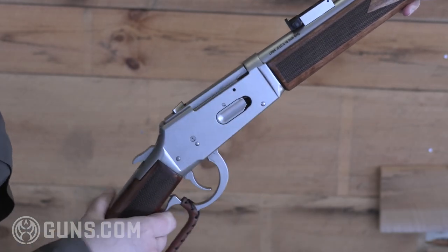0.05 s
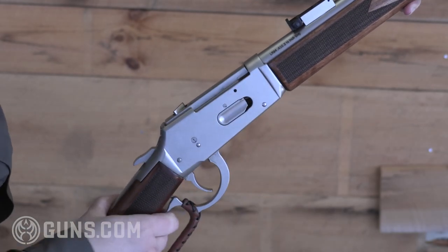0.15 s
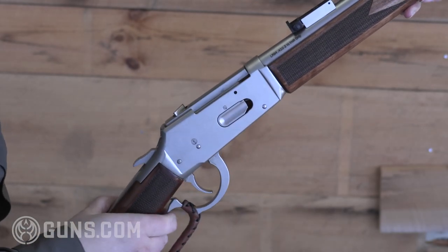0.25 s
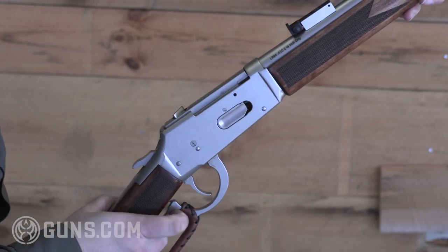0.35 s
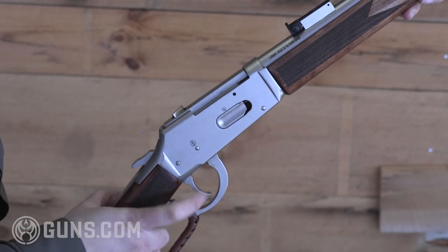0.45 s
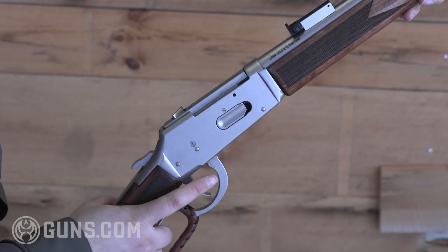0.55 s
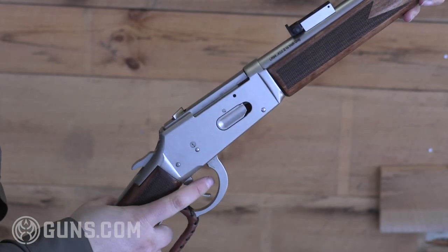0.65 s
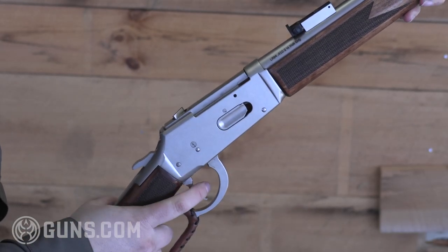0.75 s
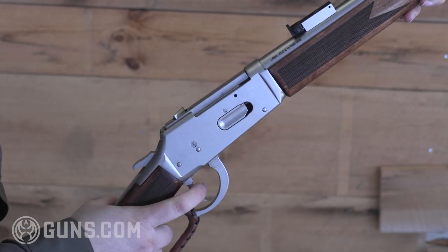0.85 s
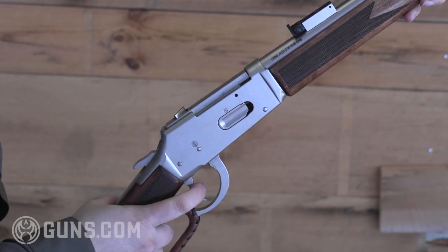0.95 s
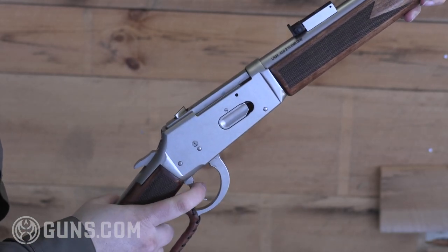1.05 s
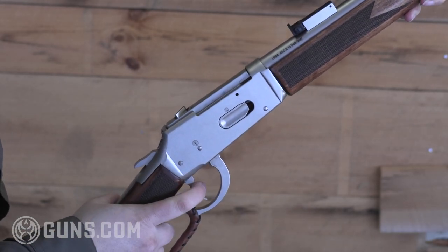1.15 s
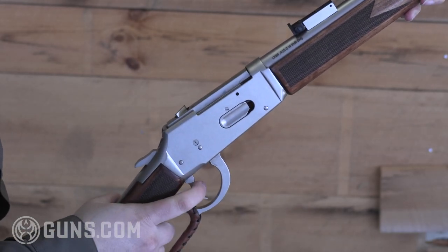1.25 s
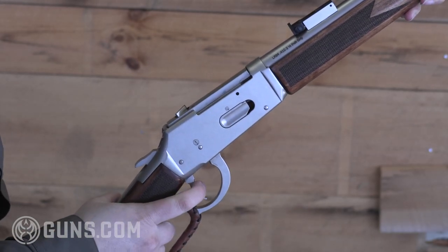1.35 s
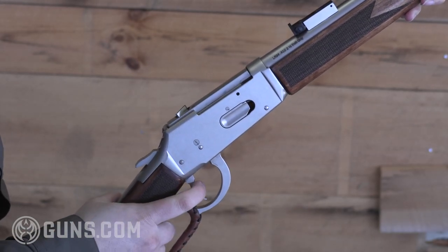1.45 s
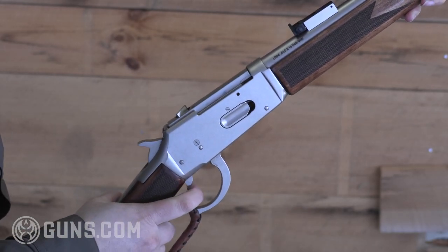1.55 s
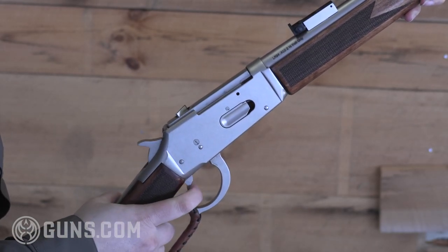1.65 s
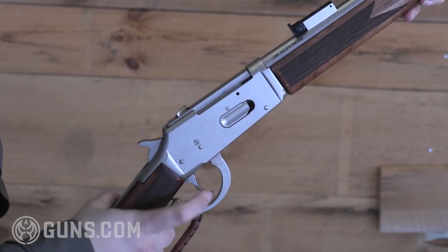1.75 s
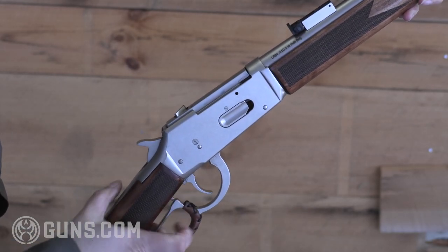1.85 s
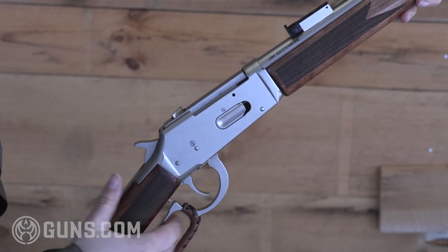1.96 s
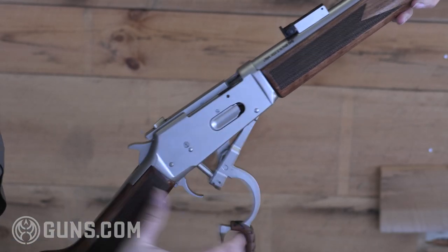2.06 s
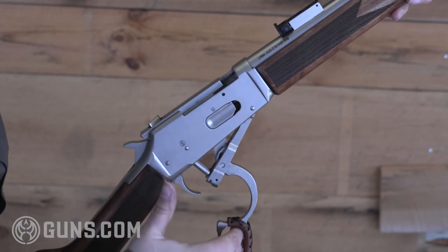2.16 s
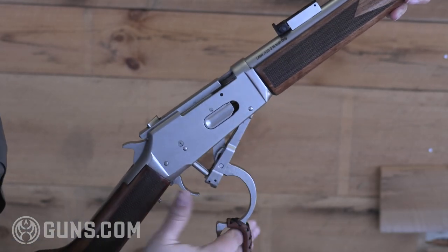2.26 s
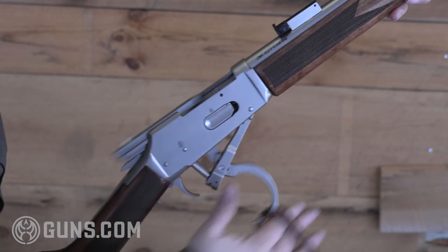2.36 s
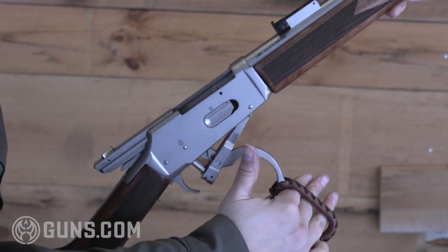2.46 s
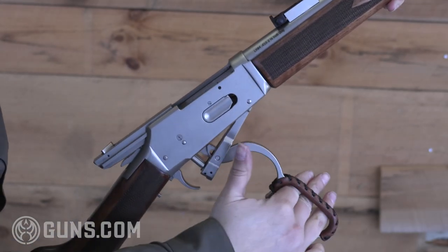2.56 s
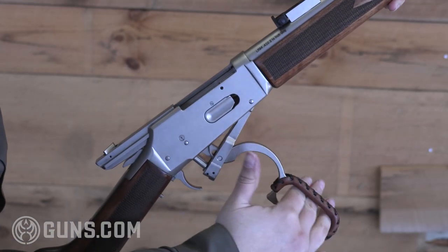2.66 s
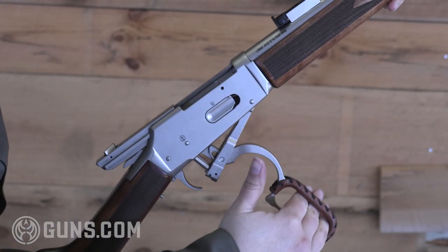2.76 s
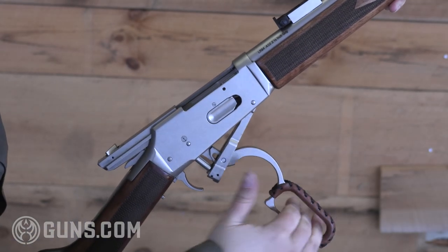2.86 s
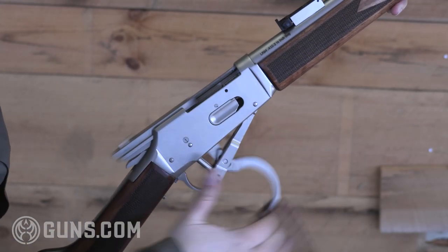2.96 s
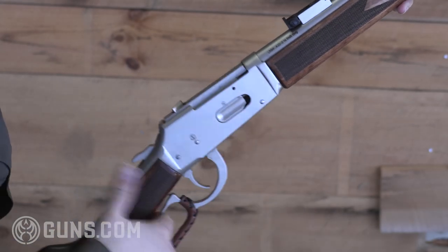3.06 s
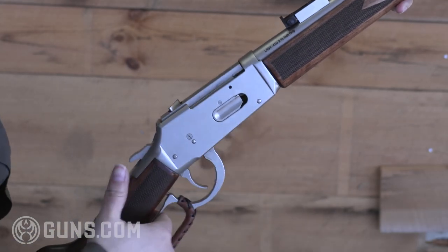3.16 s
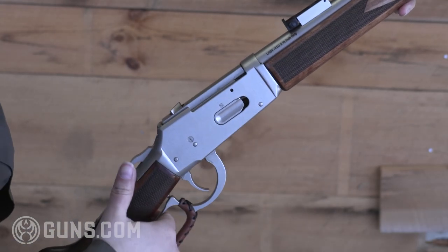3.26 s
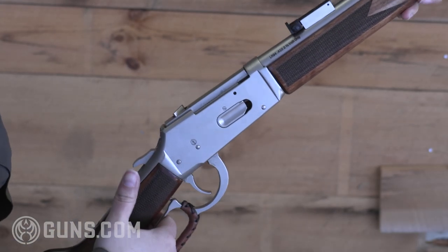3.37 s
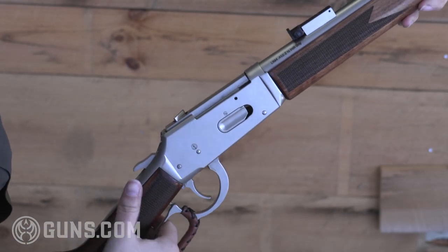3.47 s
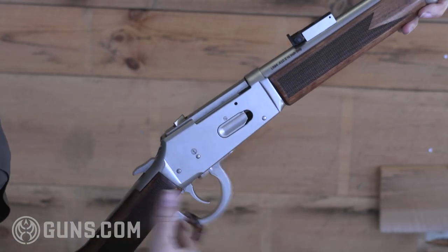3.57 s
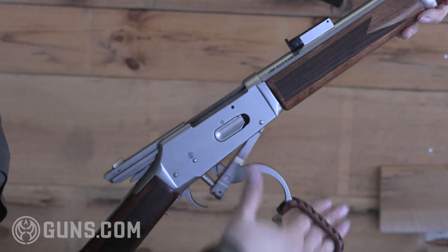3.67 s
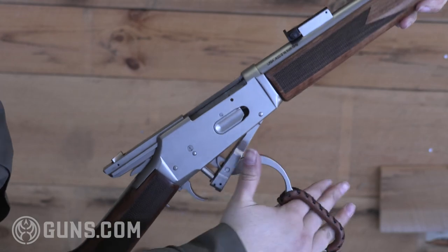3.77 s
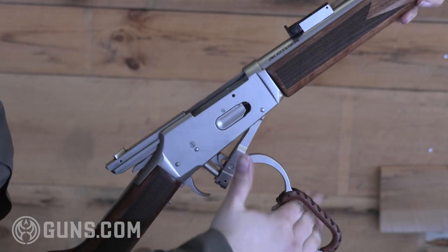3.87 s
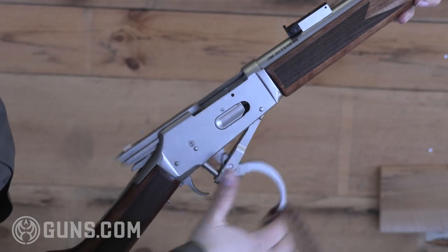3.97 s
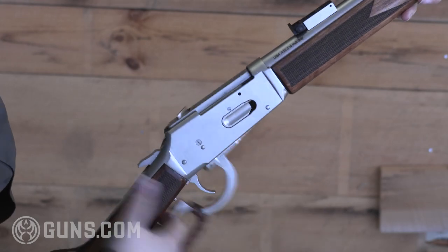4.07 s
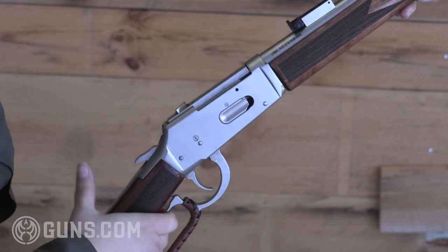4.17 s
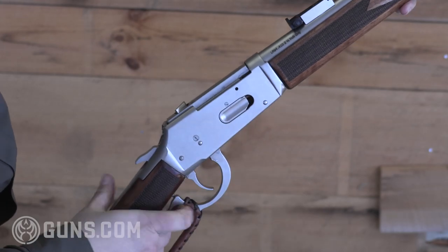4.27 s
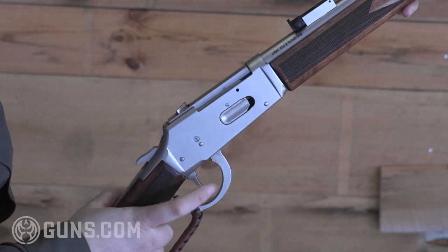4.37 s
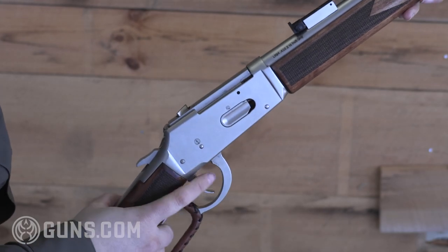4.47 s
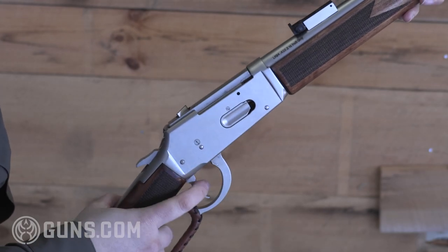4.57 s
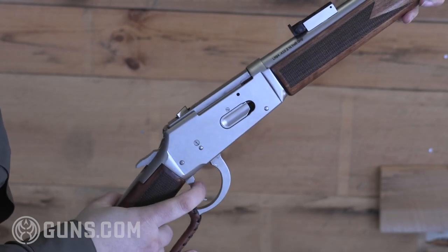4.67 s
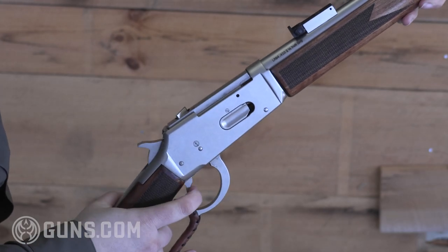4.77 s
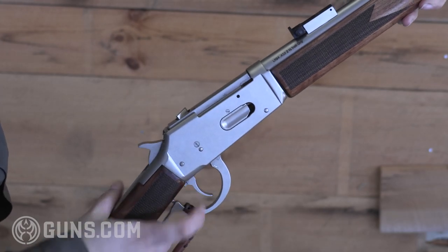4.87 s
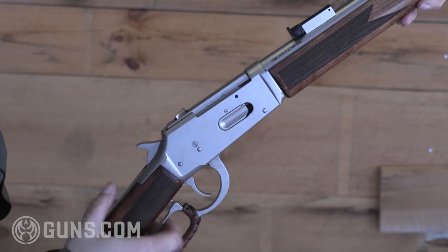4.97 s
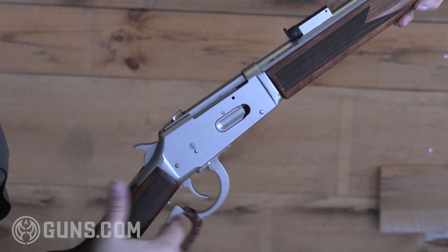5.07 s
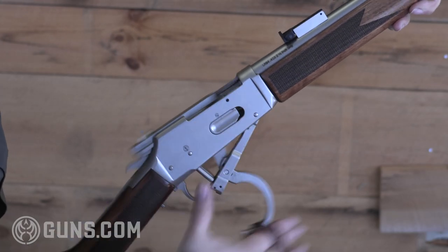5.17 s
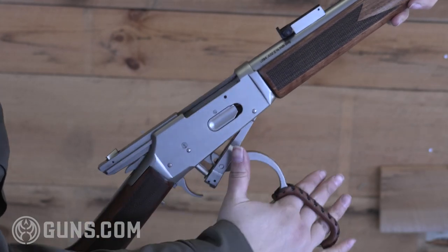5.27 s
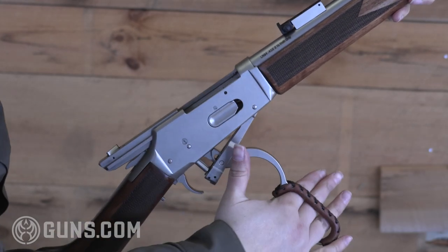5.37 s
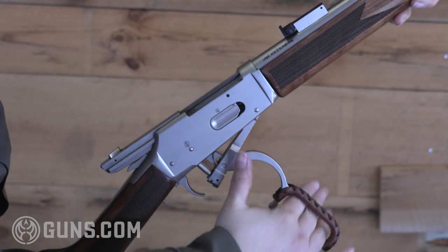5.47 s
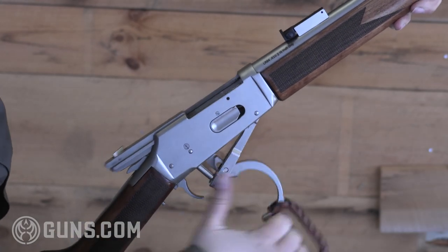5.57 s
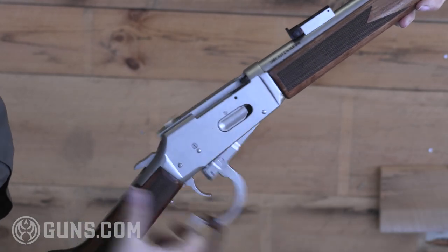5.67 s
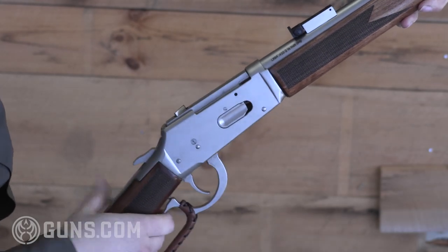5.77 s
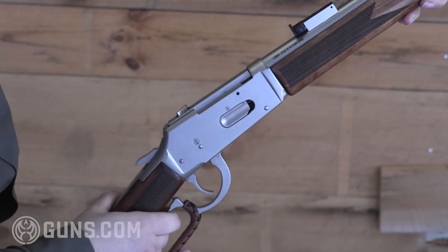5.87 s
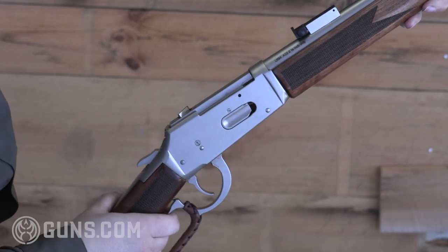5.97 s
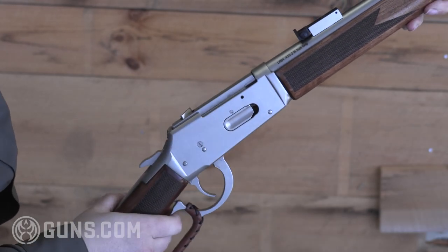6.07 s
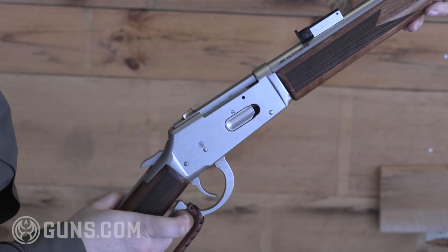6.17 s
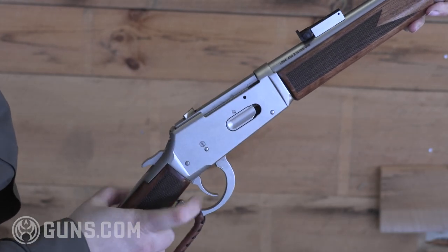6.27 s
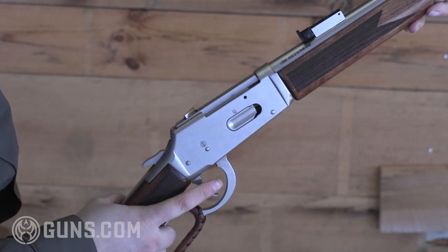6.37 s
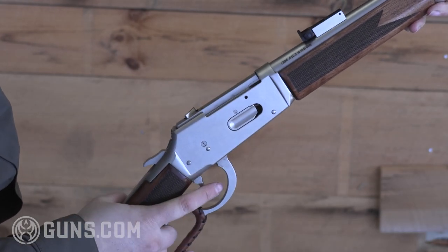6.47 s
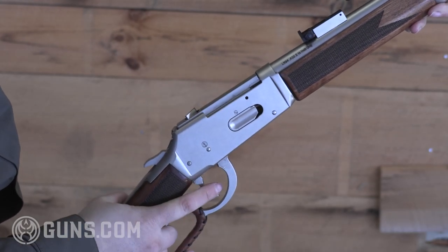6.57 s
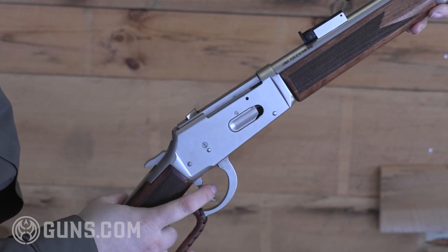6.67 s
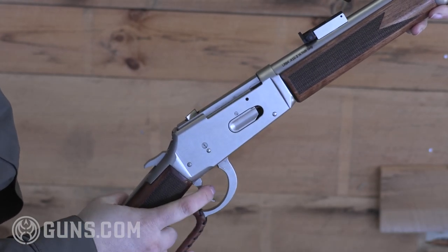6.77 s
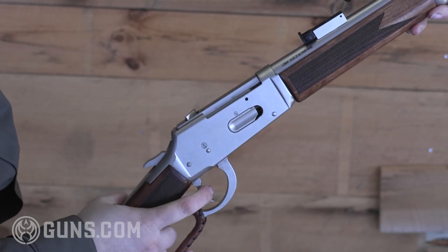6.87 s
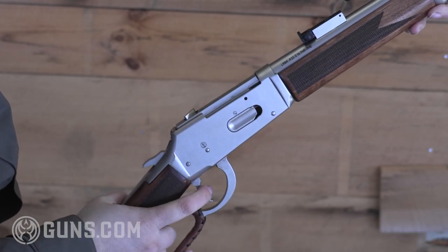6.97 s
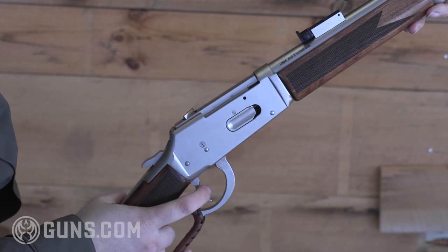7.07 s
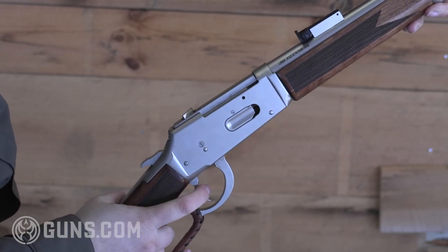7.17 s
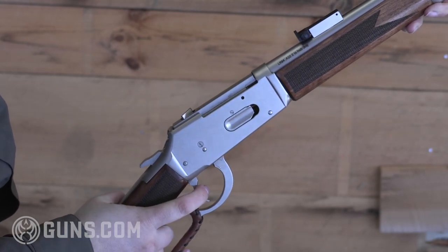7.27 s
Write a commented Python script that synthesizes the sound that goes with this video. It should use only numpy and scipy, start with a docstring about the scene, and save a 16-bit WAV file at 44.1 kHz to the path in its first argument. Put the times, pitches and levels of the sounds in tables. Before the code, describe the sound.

Close, dry-edged steel sounds in a bare wooden room over soft air and faint mains hum. A sharp hammer snap comes right at the start, its tail fading into quiet until a louder snap at 1.56 s with a strong rebound and woody boom. Small clicks lead to the lever opening at 2.1 s: a double clack, a gritty bolt slide, and a hard booming stop at 2.46. A pause, then the bolt scrapes and knocks forward from 3.0, locking at 3.1. A faster cycle opens at 3.65-3.72 and shuts at 4.02-4.14. Another loud hammer snap hits at 4.74, with clicks after. The last stroke opens at 5.14-5.28 and closes with a singing slide at 5.65-5.76. The room tail fades in under a second; only hum, air and barely audible ticks near 6.5 and 7.0 remain until about 7.4 s.

```python
"""Sharp steel clacks and rattles, close by in a bare wooden room, with soft air and mains hum behind.
A lever-action rifle drops its hammer three times, and its lever and bolt are worked three times.
Each contact is a burst of tiny random impacts that rings steel, wood and small parts, plus a low thump.
The hardest stops add a wooden boom, and the sliding bolt sings from many tiny catches.
Echoes and a fading room tail follow; the loudest peaks are cut flat."""
import sys
import numpy as np
from scipy import signal
from scipy.fft import rfft, irfft
from scipy.io import wavfile
from scipy.ndimage import uniform_filter1d

SR = 44100
rng = np.random.default_rng(int(sys.argv[2]) if len(sys.argv) > 2 else 0)


def to_wav(s):
    """Save 16-bit WAV."""
    ch = np.atleast_2d(s).T  # columns
    pcm = np.round(np.clip(ch, -1, 1) * 32767)  # PCM
    wavfile.write(sys.argv[1], SR, pcm.astype(np.int16))


N = 322812
TIME = np.arange(N) / SR  # seconds

# Still room air. Each row: frequency in Hz, relative level per Hz in dB.
AIR_COLOUR = [(25, -6), (60, -6.5), (125, -3.5), (200, -8), (320, -12), (500, -15.5), (1100, -23),
              (1800, -26.5), (5000, -31.5), (11000, -31.5), (16000, -40)]
AIR_DB = -61  # overall rms level
# Mains hum. Each row: frequency in Hz, rms level in dB.
HUM_TONES = [(120, -71), (240, -71.5), (360, -72), (442, -80.5), (1080, -77.5)]

# Ring of receiver, bolt and barrel. Each row: frequency in Hz, width in Hz, relative level in dB.
STEEL_MODES = [(1080, 110, -8), (1357, 25, -8), (1532, 79, 2.5), (1634, 150, -0.5), (1790, 240, 3),
               (1890, 90, 0), (2220, 82, 2), (2380, 150, 4), (2660, 220, 1), (3620, 86, 0)]
# Ring of small pins, catches and springs. Each row: frequency in Hz, width in Hz, relative level in dB.
PIN_MODES = [(6250, 67, -2), (6990, 280, -1.5), (7730, 250, -1.5), (8320, 560, 6.5), (9030, 320, 6),
             (9870, 120, -3), (10580, 250, -6), (12000, 100, -6)]

# Seven "contact values" describe how two parts meet: ring level in dB, then relative to the ring
# the stock knock in dB and sharp edge in dB, then pitch of the struck part in Hz, its tone relative
# to the ring in dB, chatter time scale in seconds, and thump relative to the ring in dB.
# The ring level is itself relative to the strength of its movement.

# Hammer falls. Each row: start in seconds, strength in dB, rebound relative to it in dB.
HAMMER_FALLS = [(.0042, -2.5, -18.5), (1.56, 0.5, 1.5), (4.7404, 0.5, 0.5)]
# One fall: the sear lets go, the hammer meets the firing pin, slams into the receiver, and two
# more contacts follow. Each row: delay in seconds, the seven contact values.
HAMMER_CONTACTS = [(-.004, -20, -12, 0, 1600, -2.5, 0.00063, -13.5),
                   (-.0005, -9.5, -9, -3, 1560, 5, .0007, -12.5),
                   (.0042, -5, -4.5, 1.5, 8210, 2, 0.0012, -10.5),
                   (.0075, -5, -14.5, -0.5, 1560, -0.5, 0.00093, -19),
                   (0.0136, -11.5, -19.5, -2.5, 2568, -3, 0.0018, -23.5)]
# The hammer's rebound. Each row: delay in seconds, the seven contact values.
REBOUND_CONTACTS = [(0.0276, -18.5, -6.5, 4.5, 7600, -1, .0009, -8),
                    (.035, -19, -13.5, -3.5, 1550, 0, .0014, -19)]

# The lever leaves its catch. Each row: start in seconds, snap in dB, scrape in dB.
UNLATCHINGS = [(2.072, -24, -3.5), (3.647, -15, -3), (5.142, -21, -1)]
# The snap, a single row: the seven contact values.
SNAP_CONTACT = (0.5, -21.5, -12, 6100, 5.5, .0008, -12)
# Two scraping ticks after it. Each row: delay in seconds, the seven contact values.
SCRAPE_CONTACTS = [(0.0106, -14, -14.5, -21, 1871, -0.5, .0016, -23.5),
                   (.019, -20.5, -23, -13, 2116, 3.5, .0012, -28.5)]

# The lever takes up the bolt with a double clack.
# Each row: start in seconds, gap in seconds, first level in dB, second level in dB.
TAKE_UPS = [(2.115, .01, -13, -7), (3.676, 0.0042, -6, -9), (5.1778, .0078, -7.5, -4)]
# Its two contacts. Each row: the seven contact values.
TAKE_UP_CONTACTS = [(0, -15, -1.5, 2260, -2.5, .0012, -10.5), (0, -8.5, -3.5, 2148, -0.5, .0012, -13.5)]
# The bolt hits its back stop, then the lever does.
# Each row: start in seconds, gap in seconds, first level in dB, second level in dB.
BACK_STOPS = [(2.4568, .008, -8, -6), (3.714, 0.01, -6.5, -6.5), (5.273, .0074, -6, -6.5)]
# Its two contacts. Each row: the seven contact values.
BACK_STOP_CONTACTS = [(0, -5.5, 0.5, 2240, 3.5, 0.0017, -6.5), (0, -6, 2.5, 2600, 4, .0015, -6)]
# The closing stroke begins, and the bolt meets the carrier.
# Each row: start in seconds, gap in seconds, first level in dB, second level in dB.
CLOSINGS = [(3.0179, 0.024, -12, -20.5), (4.0227, 0.022, -16, -11), (5.652, .0213, -18.5, -12)]
# Its two contacts. Each row: the seven contact values.
CLOSING_CONTACTS = [(-4, -19.5, -10.5, 2850, 4, 0.00047, -10), (1.5, -12, -8.5, 2740, 2, .001, -14.5)]
# The bolt runs home and the lever locks.
# Each row: start in seconds, gap in seconds, first level in dB, second level in dB.
LOCKINGS = [(3.099, 0.0071, -15.5, -5), (4.126, 0.011, -14.5, -6.5), (5.7547, .008, -10.5, -4.5)]
# Its two contacts. Each row: the seven contact values.
LOCKING_CONTACTS = [(0, -11.5, -2, 1776, 0.5, .001, -9.5), (0, -9.5, -3, 1531, -1.5, .0014, -12)]

# The bolt knocks in its rails on the way forward. Each row: start in seconds, level in dB.
RAIL_KNOCKS = [(3.0546, -12), (3.069, -11.5), (3.0772, -10), (4.0695, -14.5), (4.085, -10), (4.0997, -13.5),
               (5.699, -15), (5.715, -11.5), (5.7292, -12.5)]
# One such knock, a single row: the seven contact values.
RAIL_CONTACT = (0, -10, -2.5, 2001.5, 1.5, .00075, -16.5)
# Lone clicks of trigger, carrier and loose lever. Each row: start in seconds, ring level in dB,
# stock knock relative to ring in dB, sharp edge relative to ring in dB, pitch in Hz.
CLICKS = [(1.777, -32, -10, 2, 1340), (1.79, -40, 2, -3.5, 4180), (1.808, -30.5, -28, -3, 2930),
          (1.987, -38, -6, -17.5, 1660), (2.032, -48.5, -1, -2, 4870), (2.371, -27.5, -3, 5.5, 12170),
          (2.419, -21, -13.5, -1, 7950), (2.445, -16.5, -27, -15.5, 2330), (2.86, -51, -11, -20, 2800),
          (2.909, -50.5, 6, -8, 1440), (3.474, -31, -10, -1, 2800), (3.594, -31.5, -9.5, -19.5, 4970),
          (3.924, -32.5, -1.5, -28, 4520), (3.989, -39.5, -5.5, -27, 2840), (4.91, -28, -13, 6, 3040),
          (4.9145, -22, -2.5, 0, 1660), (4.925, -30.5, -21.5, -5.5, 4160), (5.084, -36.5, -15.5, -22, 1640),
          (5.102, -47, 4, -1, 2130), (5.239, -23.5, 2.5, 4, 8910), (5.261, -21, -4, -10, 2280),
          (5.515, -38, -15.5, -24, 1790), (5.56, -31.5, 1, -25, 2845), (6.5, -66, -8, -6, 3980),
          (6.968, -62, -8, -10, 2800)]
# The last three contact values, the same for every click; levels are relative to the ring.
CLICK_TONE_DB, CLICK_CHATTER_S, CLICK_THUMP_DB = 2.5, 0.00087, -4

# The room's answer. Each row: frequency in Hz, relative level in dB, time to fall 60 dB in seconds.
ROOM_BANDS = [(100, -9.5, .3), (298, -19.5, .35), (704, -12, 0.81), (1130, -14.5, 0.78), (1710, -9.5, 0.83),
              (2440, -11, 0.78), (4000, -13, 0.62), (6500, -16.5, 0.5), (9737, -18, .34),
              (16000, -15, 0.31)]
# Echoes from the shooter and the wall. Each row: delay in seconds, level in dB.
NEAR_ECHOES = [(.0031, -27.5), (.0068, -22)]
# The hardest stops make the wooden stock boom. Each row: start in seconds, frequency in Hz, level in dB.
STOCK_BOOMS = [(.01, 533, -20), (1.565, 398.5, -5), (2.125, 213, -15), (2.467, 250, -3.5),
               (3.724, 200, -7.5), (4.746, 128.5, -6.5), (5.281, 1000, -9)]
# The bolt rubs along its rails.
# Each row: start in seconds, end in seconds, relative level at start in dB, at end in dB.
BOLT_SLIDES = [(2.06, 2.105, -39, -27), (2.389, 2.455, -30, -28.5), (2.977, 3.04, -55.5, -36.5),
               (3.038, 3.084, -19, -25.5), (3.63, 3.712, -32.5, -24), (4.003, 4.04, -43, -42.5),
               (4.042, 4.125, -20, -25), (5.132, 5.176, -36.5, -25.5), (5.237, 5.27, -27.5, -24.5),
               (5.676, 5.756, -18, -29)]
# The sliding bolt's ring. Each row: frequency in Hz, width in Hz, relative level in dB.
BOLT_MODES = [(1660, 130, 4), (1955, 160, 10.5), (2220, 140, 1), (2370, 120, 5), (2680, 65, -1.5),
              (3050, 200, -6), (3840, 292, -3.5)]

CUTOFF_HZ = 16100  # top of the final sound


def from_db(db):
    """Turns decibels into a plain multiplier."""
    return 10 ** (np.asarray(db) / 20)


def rms_one(x):
    """Scales a sound to an rms level of one."""
    return x / np.sqrt(np.mean(x ** 2) + 1e-20)


def even(x):
    """Gives each blow the energy of a 0 dB level held for four milliseconds."""
    return x / np.sqrt(np.sum(x ** 2, axis=1, keepdims=True) / (.004 * SR))


def butter(x, hz, kind, order=2):
    """Keeps part of the frequency range with a smooth Butterworth filter."""
    safe_hz = np.clip(hz, 5, .48 * SR)
    return signal.sosfilt(signal.butter(order, safe_hz, kind, fs=SR, output="sos"), x)


def resonate(x, modes):
    """Rings several resonances side by side; a wider one dies away sooner."""
    out = 0
    for hz, width, db in modes:
        r = np.exp(-np.pi * width / SR)
        poles = [1, -2 * r * np.cos(2 * np.pi * hz / SR), r * r]
        ring = signal.lfilter([1, 0, -1], poles, x)
        out = out + from_db(db) * (1 - r * r) / 2 * ring
    return out


def background():
    """Soft room air is shaped noise; mains hum is a set of steady sine tones."""
    air_hz, air_db = np.transpose(AIR_COLOUR)
    colour_db = np.interp(np.log(np.fft.rfftfreq(N, 1 / SR) + 1), np.log(air_hz), air_db)
    air = rms_one(irfft(rfft(rng.standard_normal(N)) * from_db(colour_db), N))
    hum = np.zeros(N)
    for hz, db in HUM_TONES:
        hum += from_db(db) * np.sqrt(2) * np.sin(2 * np.pi * (hz * TIME + rng.random()))
    return from_db(AIR_DB) * air + hum


def strikes():
    """Lists every contact of the rifle: start in seconds, then the seven contact values."""
    rows = []

    def strike(s, db, contact):
        """Adds one contact at the strength of its movement."""
        rows.append((s, db + contact[0], *contact[1:]))

    def sequence(s, db, pattern):
        """Adds a fixed run of contacts."""
        for delay, *contact in pattern:
            strike(s + delay, db, contact)

    for s, db, rebound_db in HAMMER_FALLS:
        sequence(s, db, HAMMER_CONTACTS)
        sequence(s, db + rebound_db, REBOUND_CONTACTS)
    for s, snap_db, scrape_db in UNLATCHINGS:
        strike(s, snap_db, SNAP_CONTACT)
        sequence(s, scrape_db, SCRAPE_CONTACTS)
    double_clacks = (
        (TAKE_UPS, TAKE_UP_CONTACTS),
        (BACK_STOPS, BACK_STOP_CONTACTS),
        (CLOSINGS, CLOSING_CONTACTS),
        (LOCKINGS, LOCKING_CONTACTS),
    )
    for events, (first, second) in double_clacks:
        for s, gap, first_db, second_db in events:
            strike(s, first_db, first)
            strike(s + gap, second_db, second)
    for s, db in RAIL_KNOCKS:
        strike(s, db, RAIL_CONTACT)
    for click in CLICKS:
        rows.append((*click, CLICK_TONE_DB, CLICK_CHATTER_S, CLICK_THUMP_DB))
    return np.array(rows)


def chatter(decay, size, evenness, rise_s=0.00037, settle_db=-27, settle_s=0.0099, blur_hz=260):
    """A swelling, quickly spent burst of tiny impacts; hard steel spreads their energy evenly in frequency."""
    t = TIME[:size]
    onset = 1 - np.exp(-(t / rise_s) ** 2)
    main = 0.26 * t / decay * np.exp(-(t / (2.1 * decay)) ** 2)
    settling = from_db(settle_db) * np.exp(-t / settle_s)
    force = onset * (main + settling)
    impacts = rng.standard_normal((len(decay), size)) * force
    spectrum = rfft(impacts, 2 * size)
    # dividing by the blurred spectrum evens out its broad peaks and dips
    blur_bins = max(round(blur_hz * 2 * size / SR), 1)
    colour = uniform_filter1d(abs(spectrum) ** 2, blur_bins)
    evened = spectrum / (colour + 1e-12) ** (np.clip(evenness, 0, 1) / 2)
    return irfft(evened)[:, :size] * onset


def steel(x, crack_db, low_hz, high_hz):
    """Rings the main steel modes over a broad crack from the many heavily damped ones."""
    return resonate(x, STEEL_MODES) + from_db(crack_db) * butter(x, [low_hz, high_hz], "band")


def pins(x, crack_db, low_hz, high_hz):
    """Rings the bright small parts over the hiss of hard edges meeting."""
    return resonate(x, PIN_MODES) + from_db(crack_db) * butter(x, [low_hz, high_hz], "band")


def stock(x):
    """Passes the dull band of the wood, with equal energy for each blow."""
    return even(butter(x, [170, 1150], "band"))


def contacts(part_db, evenness, size=1536, push=0.67):
    """Each contact rings the stock, the receiver, the small parts and the struck part at its own pitch."""
    start, ring_db, knock_db, edge_db, part_hz, tone_db, decay, _ = strikes().T[:, :, None]

    def burst():
        """Draws fresh chatter for every contact."""
        return chatter(decay, size, evenness)

    # a struck part has one clear mode inside a cluster of damped ones
    part_rings = []
    for x, hz in zip(burst(), part_hz[:, 0]):
        part_rings.append(resonate(x, [(hz, 70 + 0.041 * hz, -3), (hz, 0.22 * hz, 0)]))
    part = even(np.array(part_rings))
    # small, high-pitched parts ring as hard as the edge strikes
    small = np.clip((part_hz - 5000) / 2000, 0, 1)
    # a single clean tap, with short chatter, rings the struck part most
    clean_db = 4 * np.log2(np.clip(0.00074 / decay, .7, 2.5))
    part_level_db = ring_db + small * edge_db + part_db + tone_db + clean_db

    # the blow's net momentum goes into the wood
    shove = np.exp(-((TIME[:size] - decay) / 0.00014) ** 2)
    knock = even(stock(burst()) + push * stock(shove))
    ring = even(steel(burst(), crack_db=9.5, low_hz=1370, high_hz=6600))
    edge = even(pins(burst(), crack_db=2, low_hz=5500, high_hz=12900))

    blows = knock * from_db(ring_db + knock_db)
    blows += ring * from_db(ring_db)
    blows += edge * from_db(ring_db + edge_db)
    blows += part * from_db(part_level_db)
    out = np.zeros(N + size)
    for s, blow in zip(start[:, 0], blows):
        at = max(round(s * SR), 0)
        out[at:at + size] += blow
    return out[:N]


def thumps(push_s=0.0015, low_hz=19):
    """Each contact jolts the whole rifle: a short push of air that swings back slowly."""
    jolts, t = np.zeros(N), TIME[:SR // 20]
    for s, ring_db, *_, thump_db in strikes():
        jolts[max(round(s * SR), 0)] += from_db(ring_db + thump_db)
    push = (t / push_s) ** 2 * np.exp(-t / push_s)
    pushes = signal.fftconvolve(jolts, push / push.max())[:N]
    return butter(pushes, low_hz, "high", order=3)


def room(x, build_s=0.001, size=44100):
    """Adds a diffuse tail of fading noise bands; the middle range lasts longer than bass and top."""
    t, hz = TIME[:size], np.fft.rfftfreq(size, 1 / SR)
    white, response = rfft(rng.standard_normal(size)), np.zeros(size)
    centres = np.log(np.array(ROOM_BANDS)[:, 0])
    # each band blends smoothly into its neighbours
    for share, (_, db, t60) in zip(np.eye(len(ROOM_BANDS)), ROOM_BANDS):
        band = irfft(white * np.interp(np.log(hz + 1), centres, share), size)
        decay = (1 - np.exp(-(t / build_s) ** 2)) * from_db(-60 * t / t60)
        response += from_db(db) * band * decay / np.sqrt(np.sum(decay ** 2))
    return signal.fftconvolve(x, response)[:N]


def echoes(x):
    """First reflections from the shooter and the wall are delayed, quieter copies."""
    return sum(from_db(db) * np.pad(x, (round(delay * SR), 0))[:N] for delay, db in NEAR_ECHOES)


def booms(width_hz=110, spread=0.075, size=4096):
    """One soft shove rings a broad, quickly damped mode of the wood."""
    out, t = np.zeros(N), TIME[:size]
    for s, hz, db in STOCK_BOOMS:
        at = max(round(s * SR), 0)
        fade = np.exp(-np.pi * (width_hz + spread * hz) * t)
        out[at:at + size] += from_db(db) * np.sin(2 * np.pi * hz * t) * fade
    return out


def slides(catches_per_s=4000, spread_db=2.5, fade_s=.003, grit_db=-8, grit_full_db=-24,
           judder_db=2.5, judder_s=0.0022):
    """Tiny catches between bolt and rails keep the bolt ringing; pressing harder adds a bright grit."""
    caught = rng.random(N) < catches_per_s / SR
    direction = rng.choice([-1, 1], N)
    strength_db = spread_db * np.minimum(rng.exponential(1, N), 4)
    catches = caught * direction * from_db(strength_db)
    # the bolt sticks and slips, so the catches swell and shrink at random
    judder = rms_one(uniform_filter1d(rng.standard_normal(N), max(round(judder_s * SR), 1)))
    catches = catches * from_db(judder_db * np.clip(judder, -2, 2))
    sing = rms_one(resonate(catches, BOLT_MODES))
    grit = rms_one(butter(catches, [450, 9500], "band"))
    force = np.zeros(N)
    for start, end, first_db, last_db in BOLT_SLIDES:
        gate = np.clip(np.minimum(TIME - start, end - TIME) / fade_s + .5, 0, 1)
        force += gate * np.interp(TIME, [start, end], from_db([first_db, last_db]))
    grit_share = np.clip(force / from_db(grit_full_db), 0, 1.5)
    return force * (sing + grit * from_db(grit_db) * grit_share)


def scene():
    """Adds up the rifle close by, its first echoes, the room, and the still air with hum."""
    rub = from_db(-4) * slides()
    near = from_db(-4.5) * contacts(part_db=-1.0, evenness=0.98) + rub + booms()
    # the rifle radiates differently to each side, and the room blends it all
    around = np.zeros(N)
    for side in range(2):
        sent_out = from_db(-9) * contacts(part_db=-6, evenness=0.79) + from_db(-11) * rub
        around += room(sent_out)
    return (near + echoes(near) + from_db(0.52) * around + thumps() + background())[None]


def record(dry, top=1.0):
    """Cuts loud peaks flat, then removes the highest treble with a steep filter."""
    clipped = np.clip(dry, -top, top)
    return signal.sosfilt(signal.ellip(10, .1, 70, CUTOFF_HZ, fs=SR, output="sos"), clipped)


dry = scene()
out = record(dry)
to_wav(out)
```